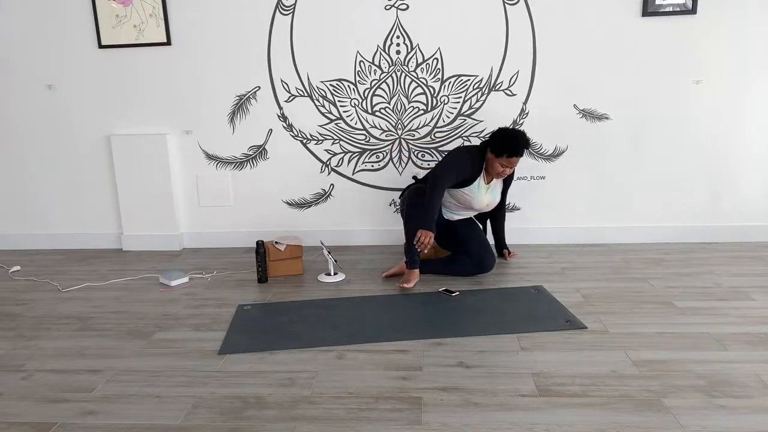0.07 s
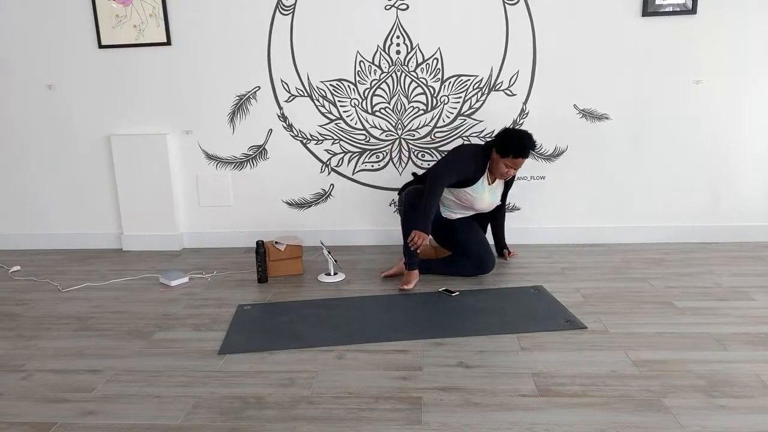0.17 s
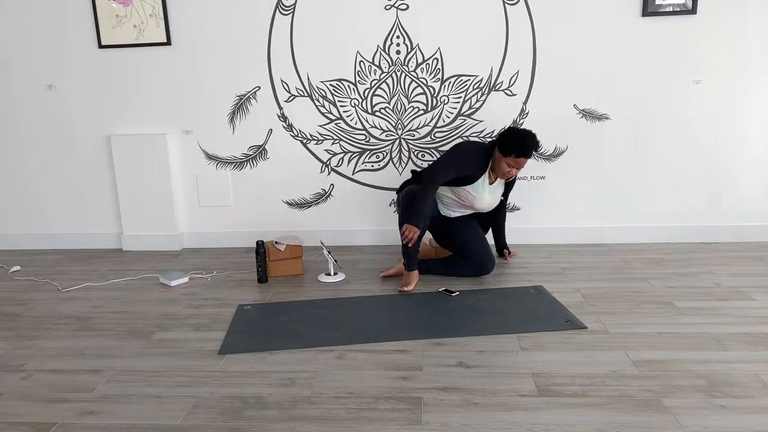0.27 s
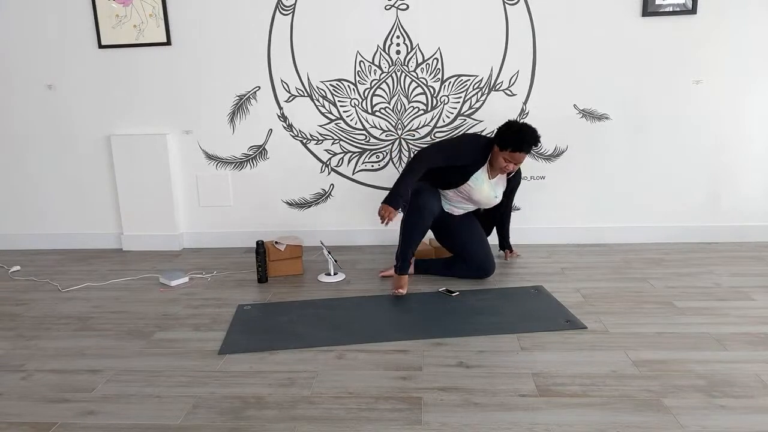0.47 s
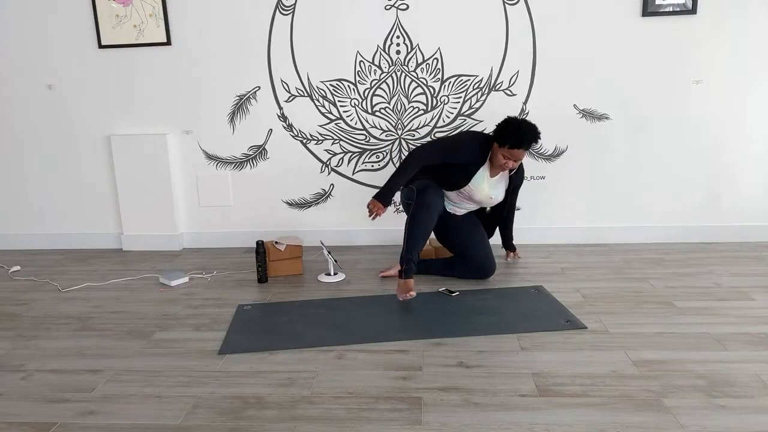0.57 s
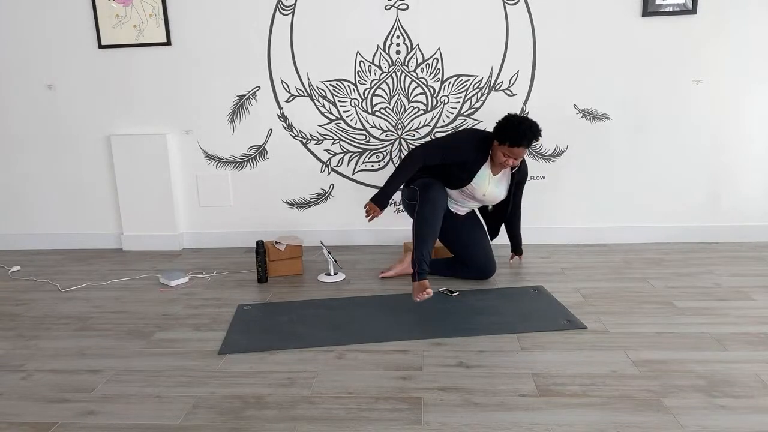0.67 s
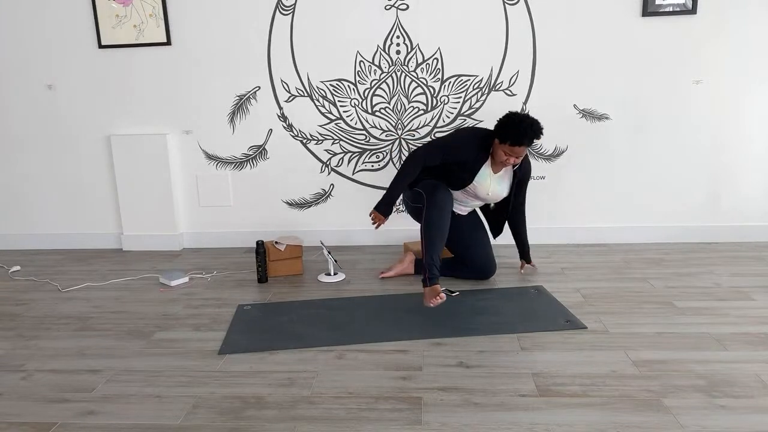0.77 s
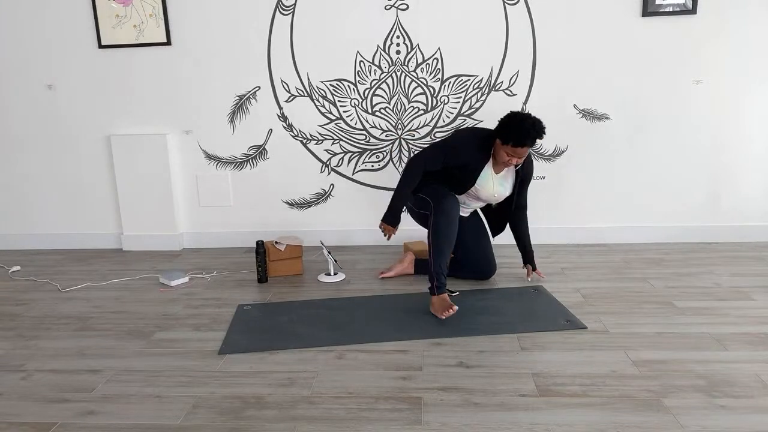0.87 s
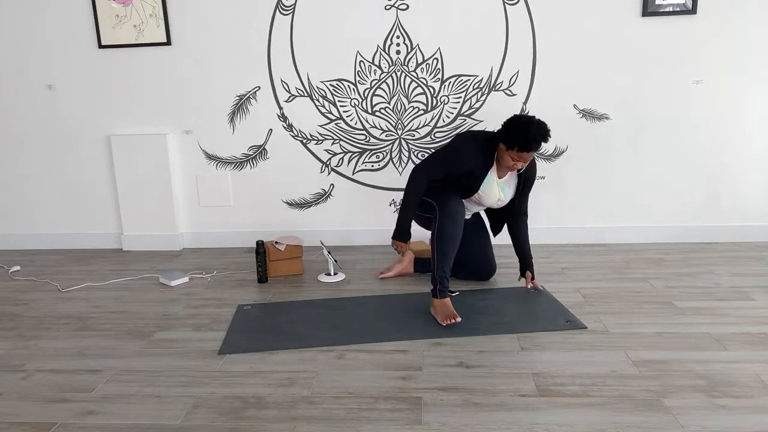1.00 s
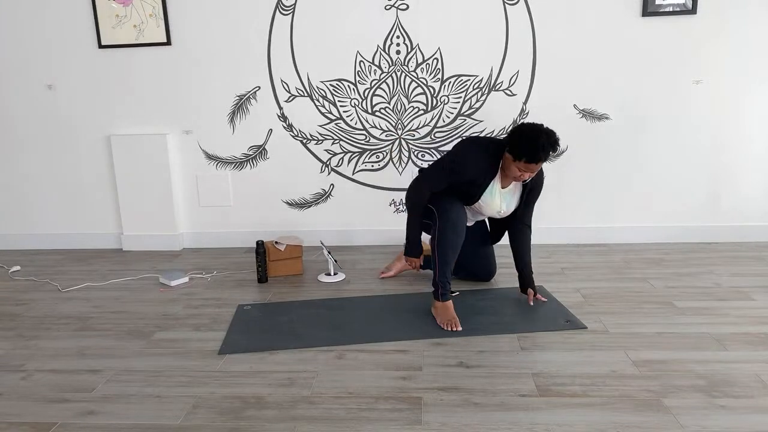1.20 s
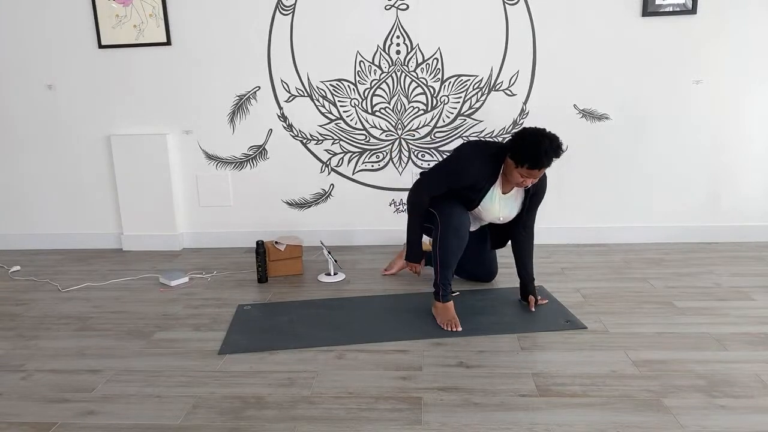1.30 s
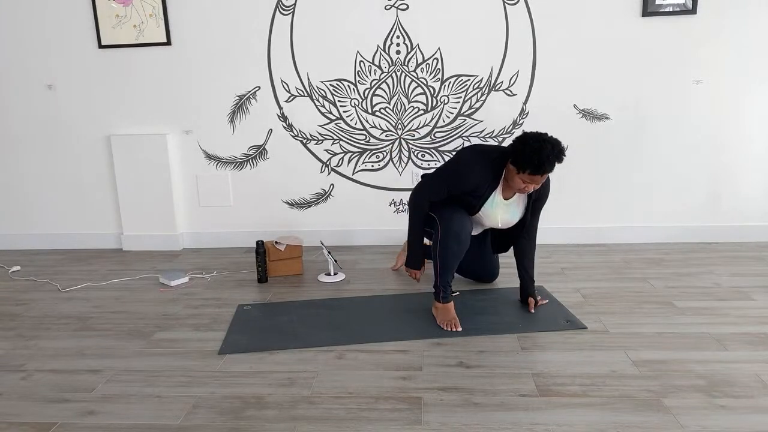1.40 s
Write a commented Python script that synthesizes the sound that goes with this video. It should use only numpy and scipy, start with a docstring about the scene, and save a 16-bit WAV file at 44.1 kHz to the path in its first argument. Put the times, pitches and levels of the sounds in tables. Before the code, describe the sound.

A loud woody thump on floorboards comes almost at once, just after a faint foot scuff. Its echo fades in a bare, reverberant room, leaving soft footfalls, cloth rustles, a hand tap and a sharp closing crack.

```python
"""One loud thump on a wooden floor, from someone kneeling who gets up in a bare, echoing room.
Damped board modes and a skin slap make the blow; banded noise and room modes make its echo,
which a noise suppressor turns down band by band.
Around it, filtered noise makes a bare foot's scuff, rustling clothes and a very quiet hiss,
while short resonances make soft footfalls, a tick, a hand tap and a sharp crack."""
import sys
import numpy as np
from scipy import signal
from scipy.fft import rfft, irfft
from scipy.io import wavfile
from scipy.ndimage import uniform_filter1d

SR = 44100
rng = np.random.default_rng(int(sys.argv[2]) if len(sys.argv) > 2 else 0)


def unload_audio(sound):
    """Save the sound as a 16-bit wav file, at the path given as the first command line argument."""
    columns = np.transpose(np.atleast_2d(sound))
    # keep every value between -1 and 1, then stretch to whole-number steps
    steps = np.round(np.clip(columns, -1, 1) * 32767)
    wavfile.write(sys.argv[1], SR, steps.astype(np.int16))


N = 63945
TIME = np.arange(N) / SR

# Tint of the background hiss. Each row: frequency in Hz, relative level in dB per Hz.
HISS_SPECTRUM = [(30, -6), (60, -9.5), (100, -14.5), (190, -3), (320, 0), (450, -4), (750, -8.5),
                 (1300, -13), (2100, -12), (3200, -9.5), (4200, -14.5), (6400, -19), (8000, -31),
                 (16000, -36.5)]
# The hiss sinks in the quietest stretch. Each row: time in seconds, change in dB.
HISS_DRIFT = [(0.0, -0.5), (0.2, 1), (0.8, 1.5), (0.95, 0.5), (1.1, -1.9), (1.22, -1.5), (1.35, 1)]
HISS_DB = -77.5

# The foot rubs along the floor. Each row: time in seconds, level in dB.
SCUFF_LEVEL = [(0.044, -73), (0.049, -65), (0.085, -62), (0.112, -62.5), (0.124, -70), (0.148, -70),
               (0.156, -89)]
SCUFF_HZ, SCUFF_WIDTH_HZ = 830, 300

# Clothes rustle. Each row: middle in seconds, length in seconds, level in dB,
# low edge in Hz, high edge in Hz.
CLOTH_RUSTLES = [(0.1, .06, -76, 1920, 3580), (0.524, 0.013, -66, 2800, 5240),
                 (0.838, 0.063, -79.5, 1815, 4450), (0.902, .028, -68, 1282, 6900),
                 (1.155, 0.012, -77.5, 1880, 3160), (1.251, 0.0049, -70.5, 1200, 5000),
                 (1.38, 0.053, -79, 280, 3400), (1.44, .012, -68, 1200, 5950)]

# Soft knocks of feet and knee. Each row: start in seconds, peak in dB, pitch in Hz, t60 in seconds.
SOFT_KNOCKS = [(0.0695, -46.5, 787.6, .016), (0.0760, -62.5, 408, 0.031), (0.7560, -66.5, 760, 0.051),
               (0.9020, -64.5, 900, 0.033), (1.2473, -52.5, 518, 0.013), (1.3543, -63, 780, 0.044),
               (1.382, -63, 283, 0.022)]
KNOCK_RISE_S = 0.002

# Contacts of the thump. Each row: start in seconds, relative strength in dB.
THUMP_CONTACTS = [(0.2096, -32.5), (0.2159, -14.5), (0.2176, -1), (0.2209, -11), (0.2266, -17)]
# Modes of the floorboards. Each row: frequency in Hz, relative level in dB, t60 in seconds.
BOARD_MODES = [(310, -19, 0.004), (508.3, 4, .012), (790.6, -0.5, .011), (1099, -8, .011),
               (1316, -15, .012), (1621, -13, .012), (2378, -12, 0.0052), (3135, -19, 0.004)]
CONTACT_RISE_S = 0.00081
THUMP_DB, THUMP_LOW_HZ, THUMP_SOFT_HZ, RUMBLE_CUT_HZ = 6, 210.6, 3300, 100
WEIGHT_HZ, WEIGHT_DB, WEIGHT_T60_S = 54.58, -55.5, 0.06

# Bare skin slaps the boards at the thump.
SLAP_S, SLAP_DB, SLAP_T60_S = 0.2175, -40, 0.014
SLAP_LOW_HZ, SLAP_HIGH_HZ = 2800, 5560

# The echo's starting balance. Each row: frequency in Hz, relative level in dB per third octave.
ECHO_SPECTRUM = [(45, -73.5), (100, -61), (160, -42.5), (220, -30), (330, -24.5), (520, -21), (800, -22),
                 (1100, -28.5), (1600, -34.5), (2050, -41), (2600, -38.5), (3250, -42.5), (4100, -56.5),
                 (5100, -72), (8000, -79.5)]
# Main decay of the diffuse echo. Each row: frequency in Hz, t60 in seconds.
ECHO_DECAY = [(100, 0.59), (250, 0.6), (600, 0.67), (1300, 0.72), (2500, 0.42), (4000, 0.36), (6000, 0.44)]
# Room resonances that stand out of the echo. Each row: frequency in Hz, relative level in dB.
ROOM_RESONANCES = [(208, -29.5), (247, -30), (280, -28), (311, -25.5), (503, -22), (562, -22), (603, -23),
                   (635, -21.5), (732, -29.5), (816, -28.5), (1116, -38.5), (1286, -32), (1409, -38.5),
                   (1615, -36.5)]
# The echo swells and dips as it dies. Each row: middle in seconds, length in seconds, change in dB.
ECHO_SWELLS = [(0.251, 0.0096, -2), (0.335, 0.018, 1), (0.417, 0.016, -2.5), (0.585, 0.036, 2),
               (0.689, 0.055, 3.5), (0.762, 0.016, -10)]
# Thresholds of the suppressor. Each row: frequency in Hz, band level in dB.
GATE_THRESHOLDS = [(100, -92), (200, -66.5), (500, -56.5), (1000, -56), (1600, -63), (2100, -62),
                   (2600, -61.5), (3200, -65), (4200, -70), (6000, -89.5)]
ECHO_START_S, ECHO_BUILD_S = 0.2195, 0.011
DIFFUSE_DB = -1.5
LINGER_DB, LINGER_T60_S = -19.5, 1.487  # a slower part of the diffuse echo
MODES_DB, MODES_T60_S = -4, 0.62
GATE_DEPTH_DB, GATE_KNEE_DB, GATE_WINDOW_S = 20.5, 11, 0.086

# Modes of a small tick. Each row: frequency in Hz, relative level in dB, t60 in seconds.
TICK_MODES = [(1880, -60, 0.02), (2310, -44, 0.0098), (2770, -61, 0.015)]
# Modes of the hand tap. Each row: frequency in Hz, relative level in dB, t60 in seconds.
TAP_MODES = [(292, -57, 0.021), (788, -44.5, 0.015), (1490, -42, 0.015), (1750, -50, 0.013),
             (3050, -46.5, 0.0099), (4350, -46.5, 0.0083), (5850, -47, 0.0069)]
# Modes of the sharp crack. Each row: frequency in Hz, relative level in dB, t60 in seconds.
CRACK_MODES = [(1090, -52, 0.0052), (1894, -27.5, 0.011), (2187, -33, 0.018), (3360, -23.5, 0.0053),
               (3890, -39, 0.0087), (6350, -41.5, 0.0064)]
TICK_S, TAP_S, CRACK_S = 0.9881, 1.2922, 1.4437
CLICK_RISE_S = 0.00032
CLICK_LOW_SHARE = 0.5  # little radiates below this share of the lowest mode
SCATTER_DB, SCATTER_T60_S = -8, 0.06  # nearby surfaces smear the small clicks

TREBLE_EDGE_HZ = 7000  # softens all the small sounds
CUTOFF_HZ = 15500  # from here up, at least 70 dB down


def from_db(db):
    """Decibels to gain."""
    return 10 ** (np.asarray(db) / 20)


def rms_one(x):
    """Scale to unit power."""
    return x / np.sqrt(np.mean(x ** 2) + 1e-30)


def at_hz(points, hz):
    """Read a table on a log-frequency axis."""
    table_hz, values = np.transpose(points)
    return np.interp(np.log(hz), np.log(table_hz), values)


def filtered(x, hz, kind, order=2):
    """Butterworth filter."""
    edges = np.clip(hz, 10, SR * 0.45)
    sos = signal.butter(order, edges, kind, fs=SR, output="sos")
    return signal.sosfilt(sos, x + 1e-18)


def noise(low_hz, high_hz, order=2):
    """A band of unit-power noise, with the filter's run-in dropped."""
    white = rng.standard_normal(N + SR // 4)
    return rms_one(filtered(white, [low_hz, high_hz], "band", order=order)[-N:])


def ring(start, hz, db, t60):
    """One mode struck at the given time: a sine that dies away exponentially."""
    age = np.maximum(TIME - start, 0)
    return from_db(db - 60 * age / t60) * np.sin(2 * np.pi * hz * age)


def rise(start, length):
    """A swell from nothing toward one, with length as its time constant."""
    return 1 - np.exp(-np.maximum(TIME - start, 0) / length)


def fade(age, t60):
    """Gain that loses 60 dB in t60."""
    return np.exp(-np.log(1000) * age / t60)


def swell(middle, length):
    """A bell-shaped swell of height one."""
    return np.exp(-2 * ((TIME - middle) / length) ** 2)


def hiss():
    """The faint background of the room: tinted noise with a slowly drifting level."""
    hz = np.maximum(np.fft.rfftfreq(N, 1 / SR), 1)
    spectrum = rfft(rng.standard_normal(N)) * from_db(at_hz(HISS_SPECTRUM, hz))
    level_db = HISS_DB + np.interp(TIME, *np.transpose(HISS_DRIFT))
    return from_db(level_db) * rms_one(irfft(spectrum, N))


def scuff():
    """Skin dragging on the boards excites one resonance, made as a band of noise."""
    s, db = np.transpose(SCUFF_LEVEL)
    level = from_db(np.interp(TIME, s, db)) * (TIME > s[0]) * (TIME < s[-1])
    return level * noise(SCUFF_HZ - SCUFF_WIDTH_HZ / 2, SCUFF_HZ + SCUFF_WIDTH_HZ / 2)


def clothes():
    """Brief swells of cloth noise."""
    return sum(
        from_db(db) * swell(middle, length) * noise(low, high)
        for middle, length, db, low, high in CLOTH_RUSTLES
    )


def knocks():
    """Padded touches, each swelling into one short resonance."""
    out = 0
    for start, db, hz, t60 in SOFT_KNOCKS:
        knock = ring(start, hz, 0, t60) * rise(start, KNOCK_RISE_S)
        out = out + from_db(db) * knock / np.abs(knock).max()
    return out


def thump():
    """A quick run of padded contacts pushes down on well-damped boards, and the floor sags."""
    boards = 0
    for start, db in THUMP_CONTACTS:
        modes = sum(ring(start, hz, db + mode_db, t60) for hz, mode_db, t60 in BOARD_MODES)
        boards = boards - rise(start, CONTACT_RISE_S) * modes  # minus: the push is downward
    boards = filtered(boards, THUMP_LOW_HZ, "high")
    boards = filtered(boards, RUMBLE_CUT_HZ, "high", order=1)
    boards = filtered(boards, THUMP_SOFT_HZ, "low", order=3)
    sag = ring(ECHO_START_S, WEIGHT_HZ, WEIGHT_DB, WEIGHT_T60_S)
    return from_db(THUMP_DB) * boards + sag


def slap():
    """A short bright noise burst where skin meets wood."""
    shape = rise(SLAP_S, CONTACT_RISE_S) * fade(np.maximum(TIME - SLAP_S, 0), SLAP_T60_S)
    return from_db(SLAP_DB) * shape * noise(SLAP_LOW_HZ, SLAP_HIGH_HZ)


def suppressed(band, hz):
    """Noise suppressor: turn a band down as its running level sinks under the threshold."""
    power = uniform_filter1d(band ** 2, max(int(GATE_WINDOW_S * SR), 1))
    under_db = at_hz(GATE_THRESHOLDS, hz) - 10 * np.log10(np.abs(power) + 1e-20)
    return band * from_db(-GATE_DEPTH_DB * np.clip(under_db / GATE_KNEE_DB, 0, 1))


def room_echo():
    """Diffuse echo and room resonances build up, then die by third octaves into the suppressor."""
    out = 0
    age = np.maximum(TIME - ECHO_START_S, 0)
    change_db = sum(db * swell(middle, length) for middle, length, db in ECHO_SWELLS)
    level = rise(ECHO_START_S, ECHO_BUILD_S) * from_db(change_db)
    half_band = 2 ** (1 / 6)
    for hz in 40 * 2 ** (np.arange(24) / 3):
        low, high = hz / half_band, hz * half_band
        main = fade(age, at_hz(ECHO_DECAY, hz))
        linger = from_db(LINGER_DB) * fade(age, LINGER_T60_S)
        band_gain = from_db(at_hz(ECHO_SPECTRUM, hz) + DIFFUSE_DB)
        diffuse = noise(low, high, order=4) * band_gain * np.hypot(main, linger)
        modes = sum(
            ring(ECHO_START_S, mode_hz, db + MODES_DB, MODES_T60_S)
            for mode_hz, db in ROOM_RESONANCES if low <= mode_hz < high
        )
        out = out + suppressed(level * (diffuse + modes), hz)
    return out


def click(start, modes):
    """A hard little contact rings its modes, with a short noisy scatter after it."""
    direct = sum(ring(start, hz, db, t60) for hz, db, t60 in modes) * rise(start, CLICK_RISE_S)
    direct = filtered(direct, CLICK_LOW_SHARE * modes[0][0], "high", order=3)
    scatter = rng.standard_normal(N) * fade(TIME, SCATTER_T60_S)
    scatter = scatter / np.linalg.norm(scatter)
    return direct + from_db(SCATTER_DB) * signal.fftconvolve(direct, scatter)[:N]


def scene():
    """The thump and its echo among the small sounds of getting up, over the hiss."""
    clicks = click(TICK_S, TICK_MODES) + click(TAP_S, TAP_MODES) + click(CRACK_S, CRACK_MODES)
    small = filtered(scuff() + clothes() + knocks() + clicks, TREBLE_EDGE_HZ, "low", order=10)
    blow = thump() + slap() + room_echo()
    return (hiss() + small + blow)[None]


def record(dry):
    """The input clips at full scale, then a steep low-pass cuts the top."""
    clipped = np.clip(dry, -1, 1)
    return signal.sosfilt(signal.cheby2(12, 70, CUTOFF_HZ, fs=SR, output="sos"), clipped)


dry = scene()
out = record(dry)
unload_audio(out)
```